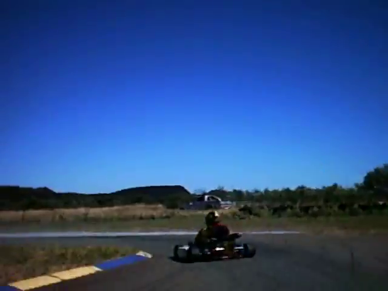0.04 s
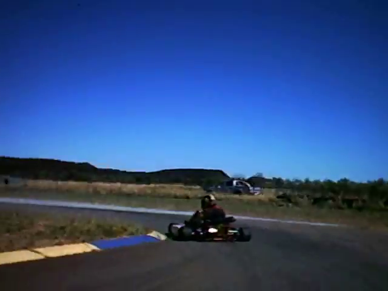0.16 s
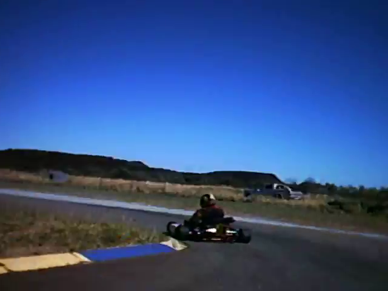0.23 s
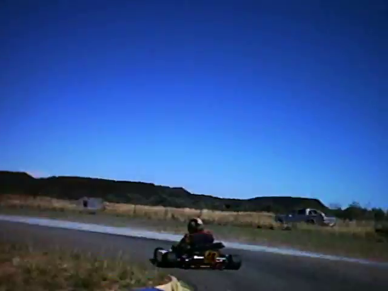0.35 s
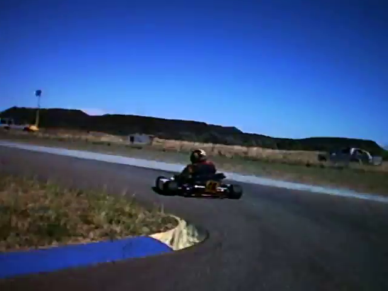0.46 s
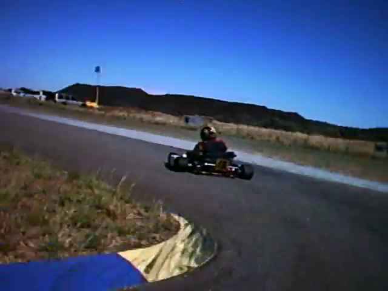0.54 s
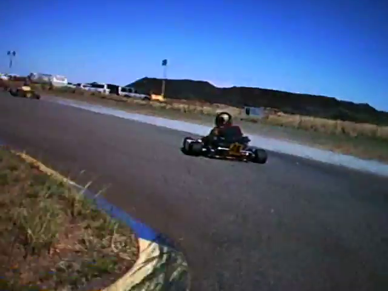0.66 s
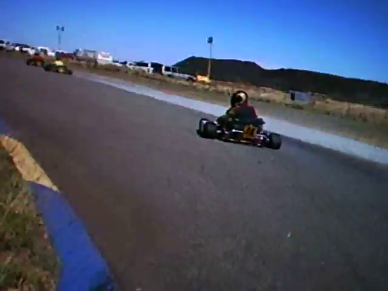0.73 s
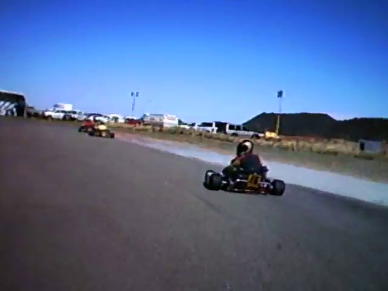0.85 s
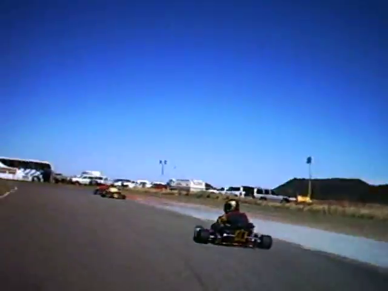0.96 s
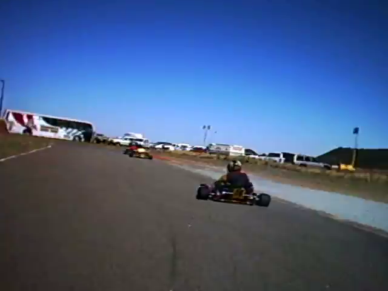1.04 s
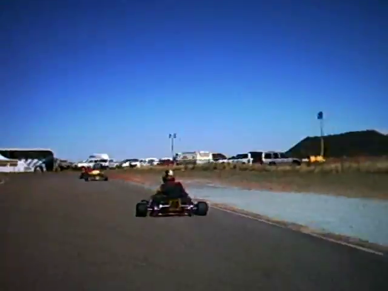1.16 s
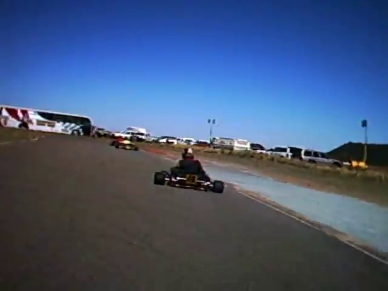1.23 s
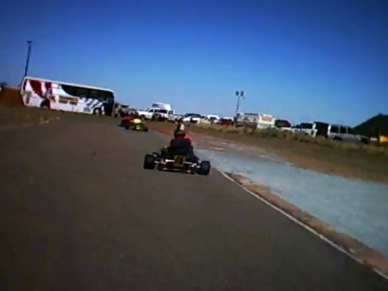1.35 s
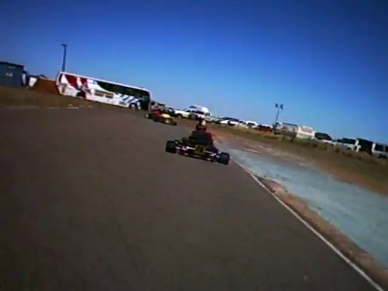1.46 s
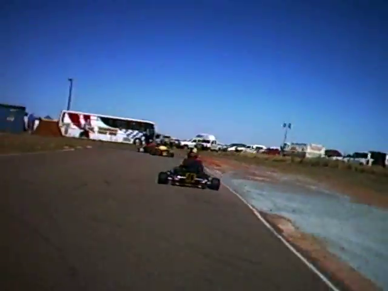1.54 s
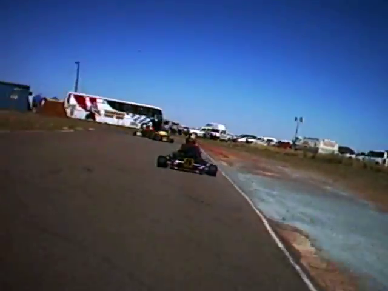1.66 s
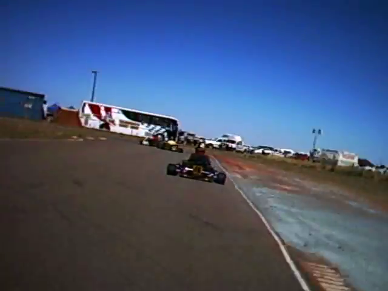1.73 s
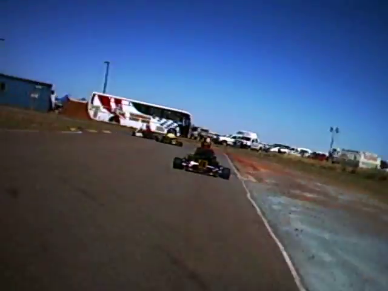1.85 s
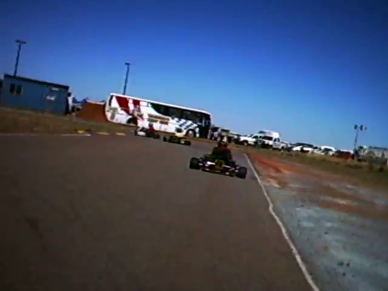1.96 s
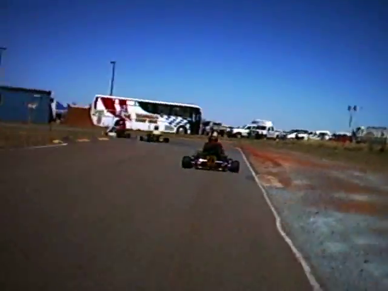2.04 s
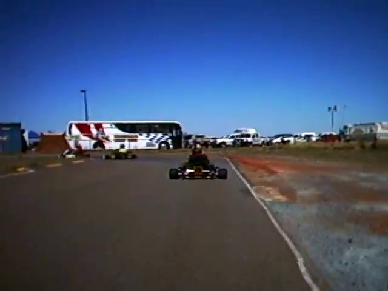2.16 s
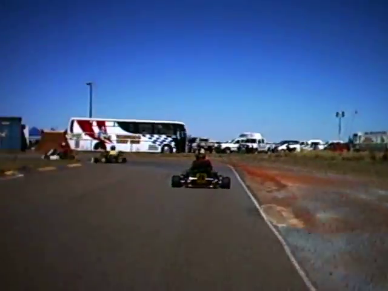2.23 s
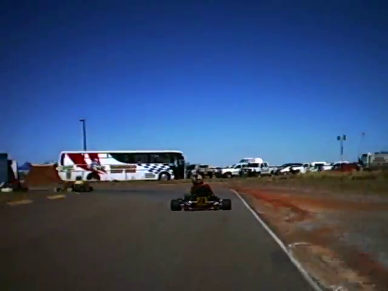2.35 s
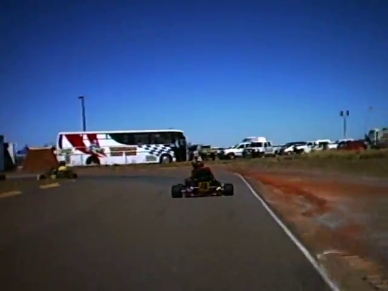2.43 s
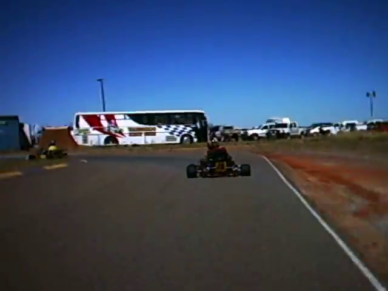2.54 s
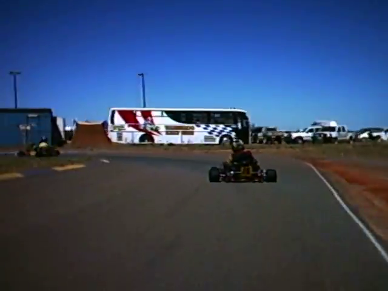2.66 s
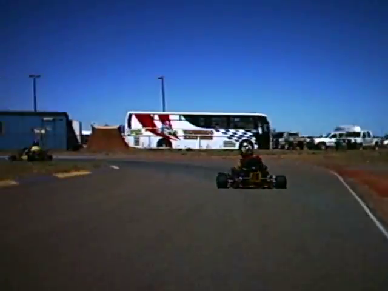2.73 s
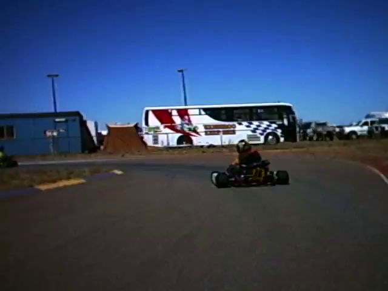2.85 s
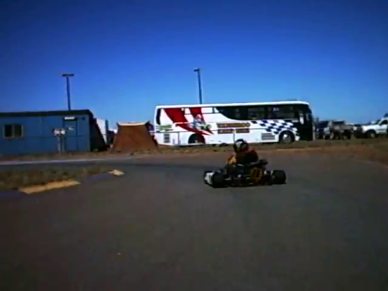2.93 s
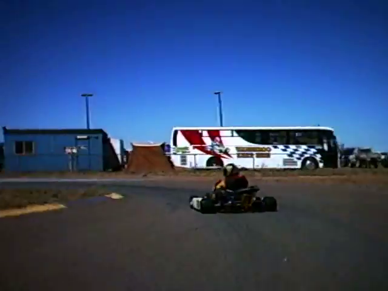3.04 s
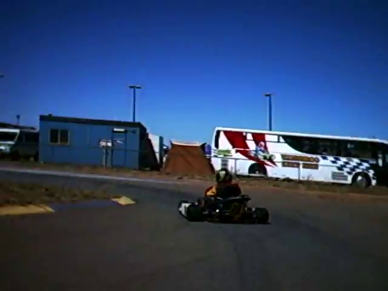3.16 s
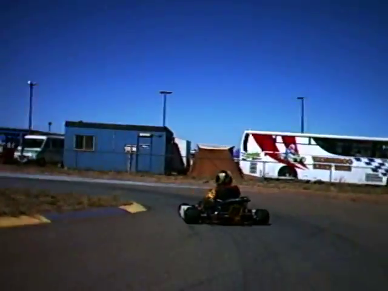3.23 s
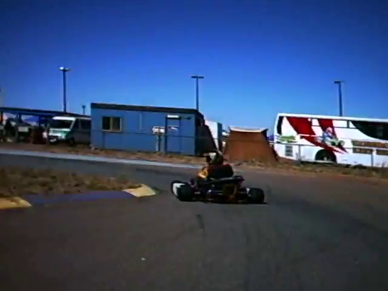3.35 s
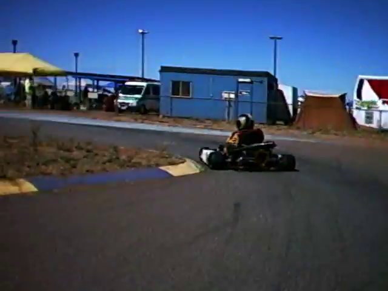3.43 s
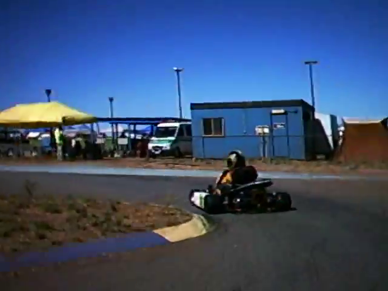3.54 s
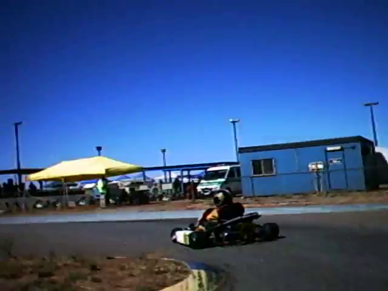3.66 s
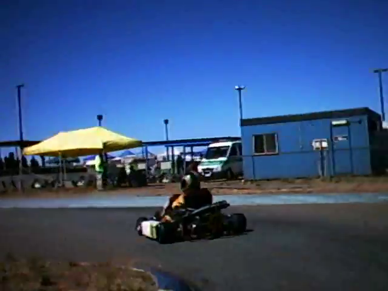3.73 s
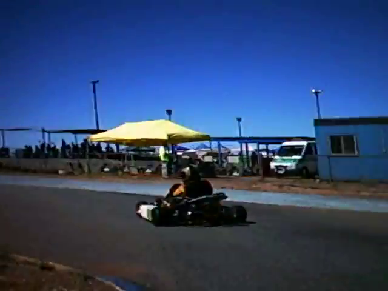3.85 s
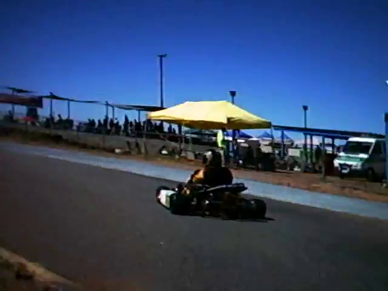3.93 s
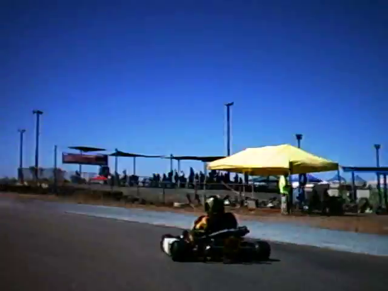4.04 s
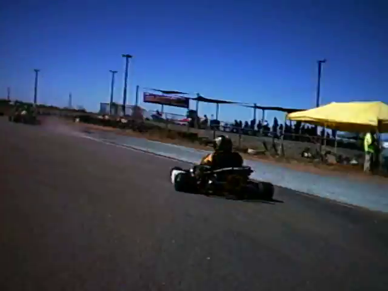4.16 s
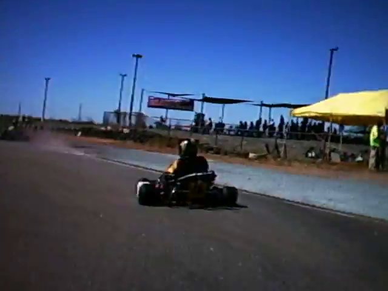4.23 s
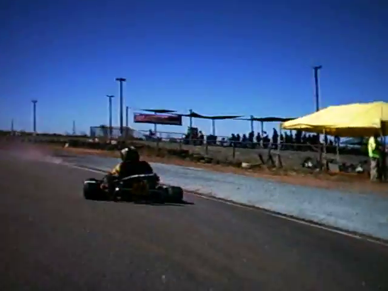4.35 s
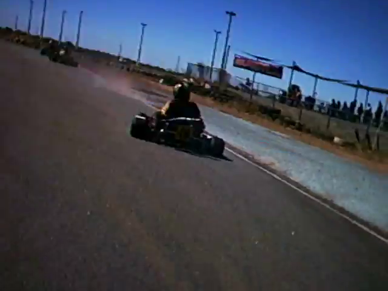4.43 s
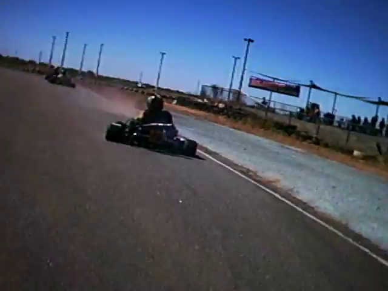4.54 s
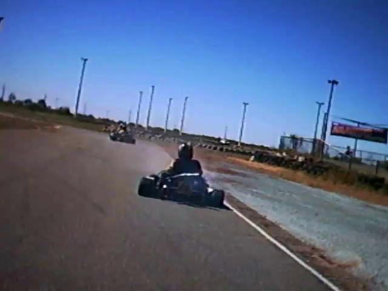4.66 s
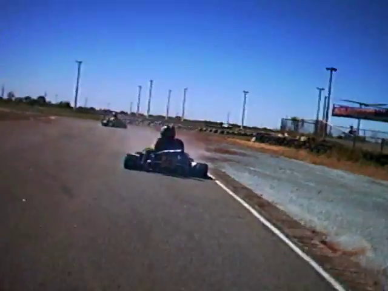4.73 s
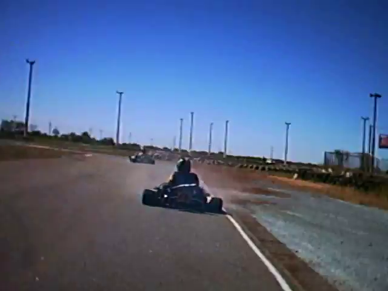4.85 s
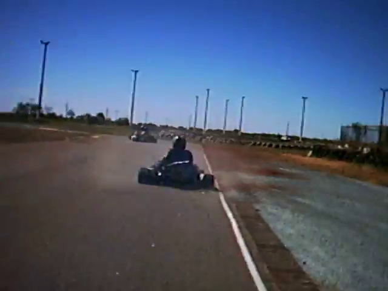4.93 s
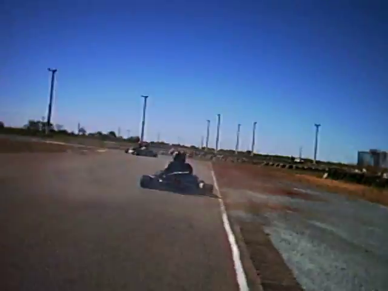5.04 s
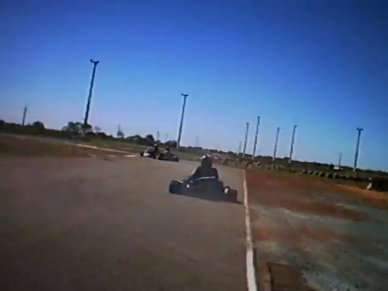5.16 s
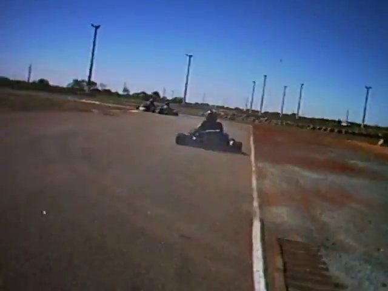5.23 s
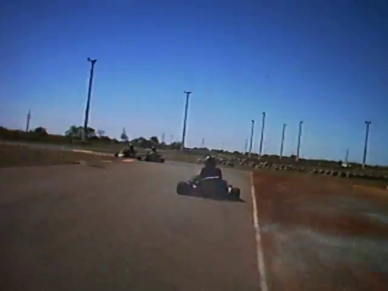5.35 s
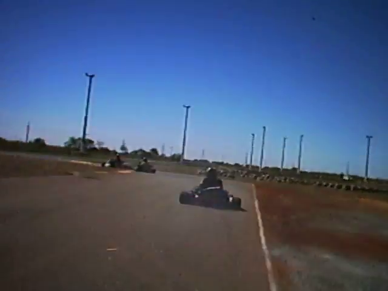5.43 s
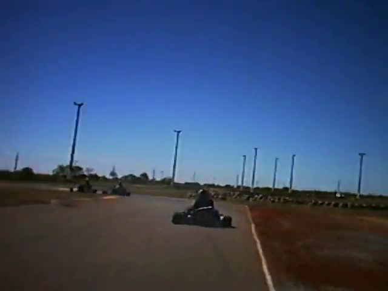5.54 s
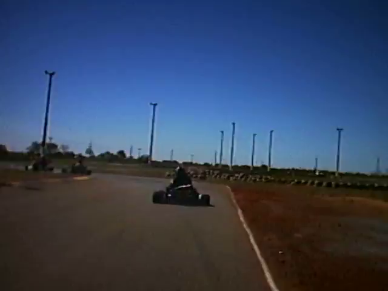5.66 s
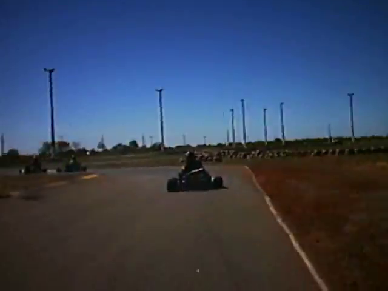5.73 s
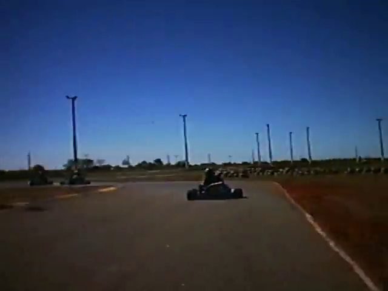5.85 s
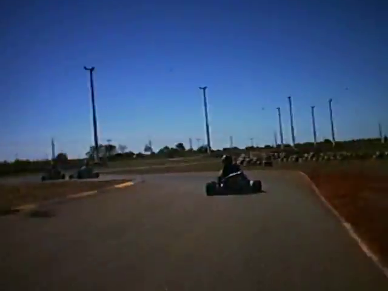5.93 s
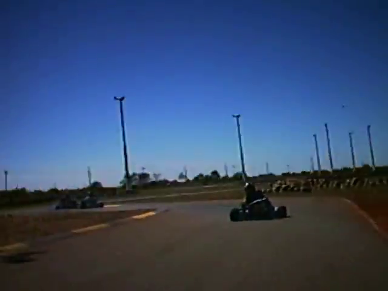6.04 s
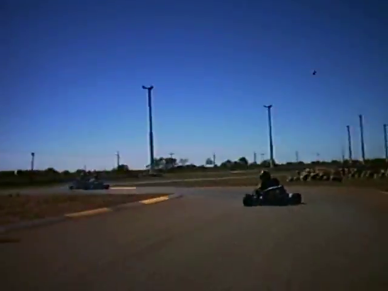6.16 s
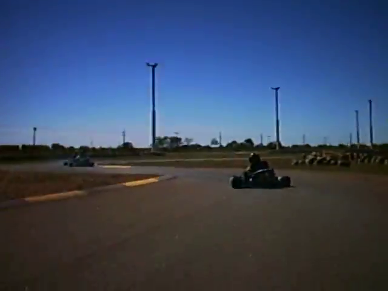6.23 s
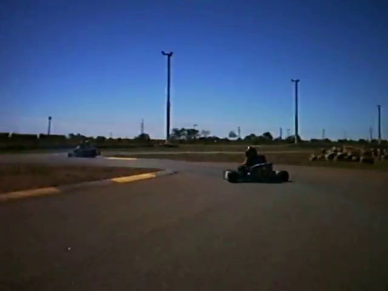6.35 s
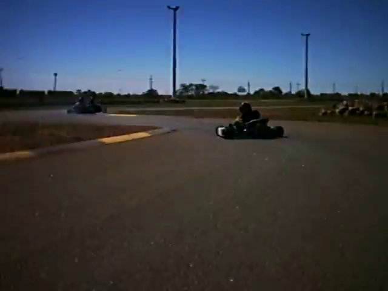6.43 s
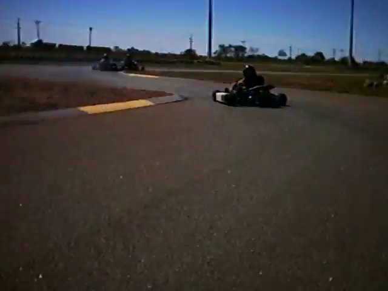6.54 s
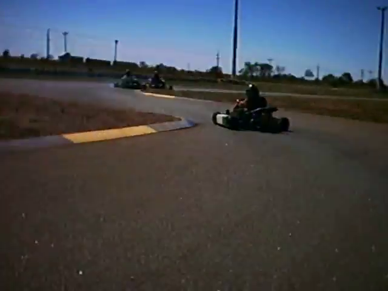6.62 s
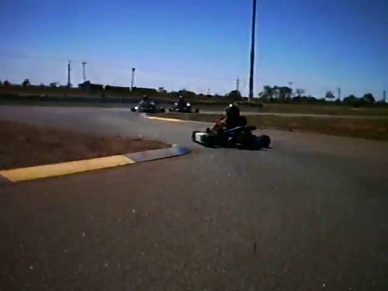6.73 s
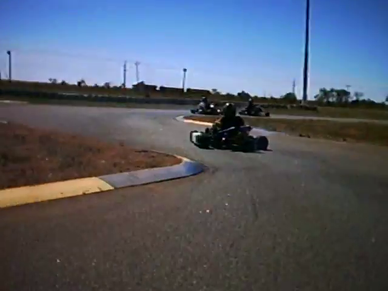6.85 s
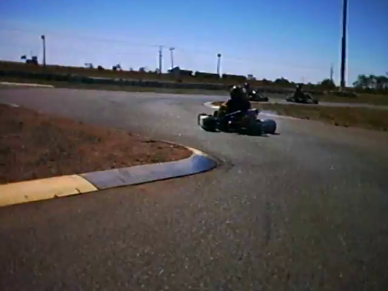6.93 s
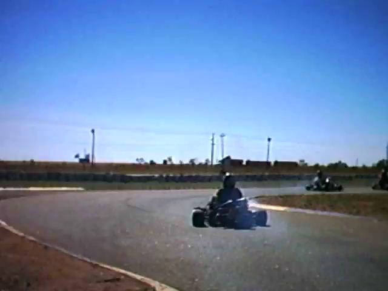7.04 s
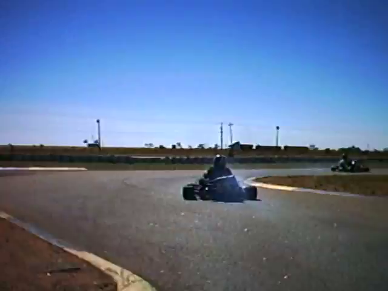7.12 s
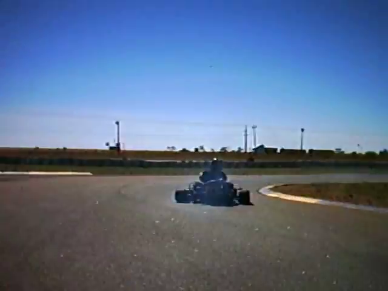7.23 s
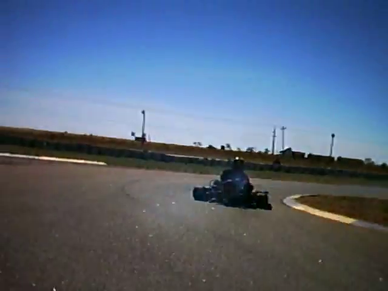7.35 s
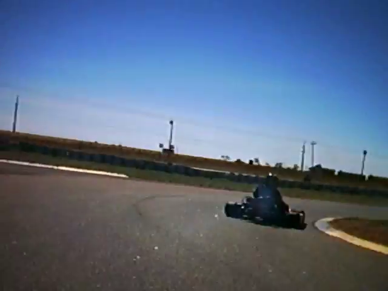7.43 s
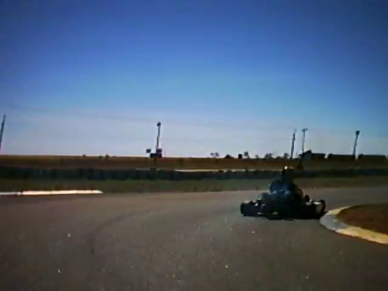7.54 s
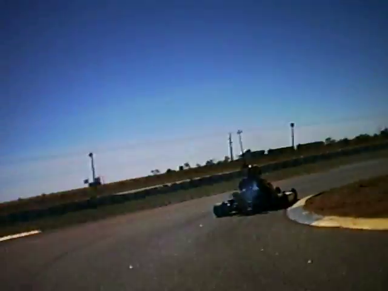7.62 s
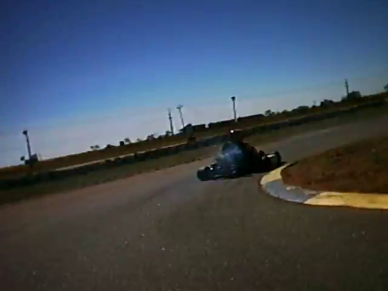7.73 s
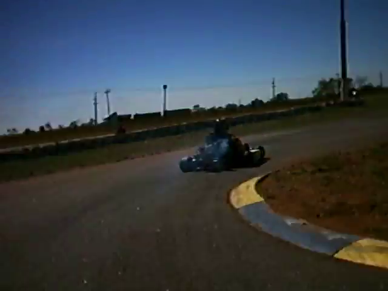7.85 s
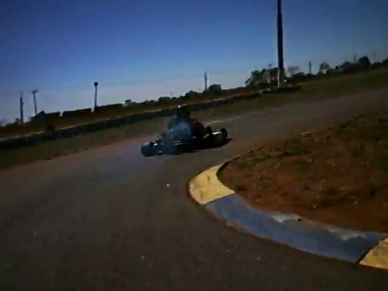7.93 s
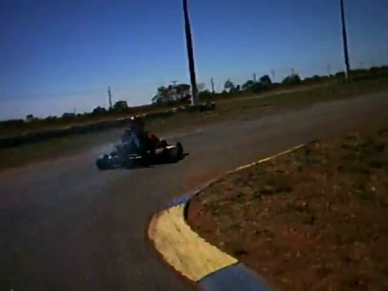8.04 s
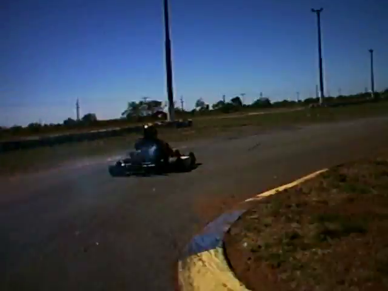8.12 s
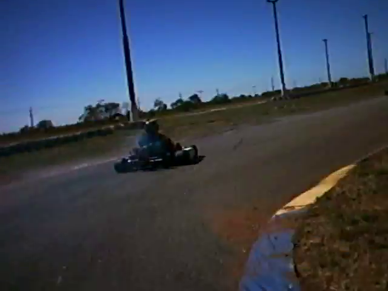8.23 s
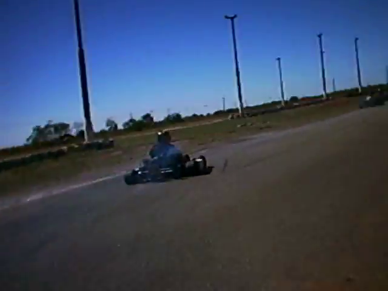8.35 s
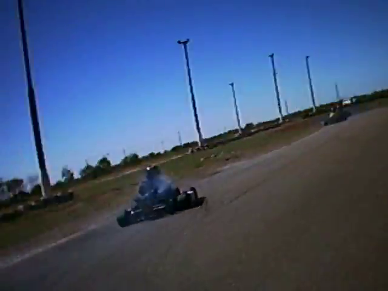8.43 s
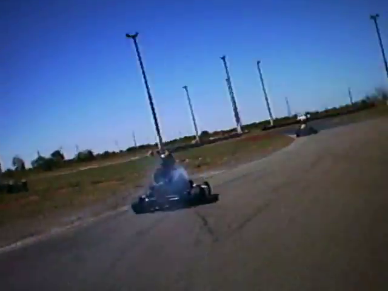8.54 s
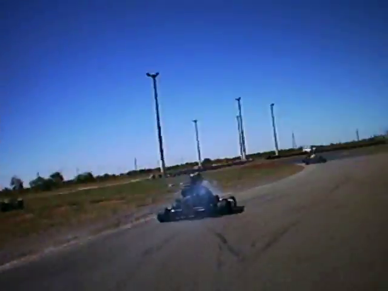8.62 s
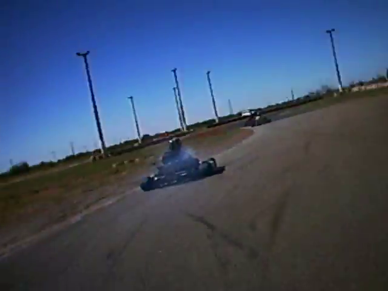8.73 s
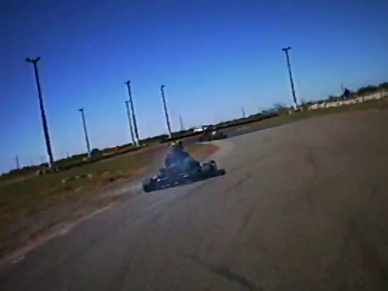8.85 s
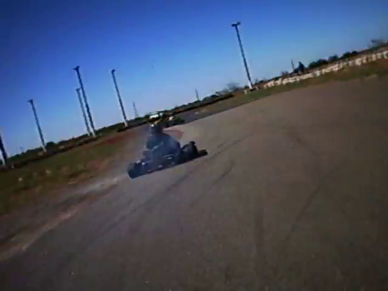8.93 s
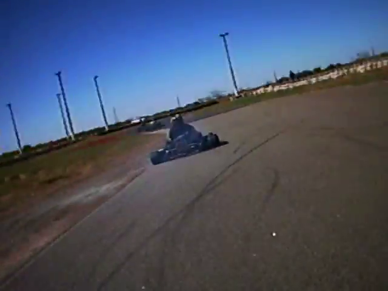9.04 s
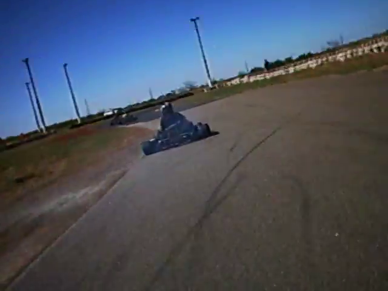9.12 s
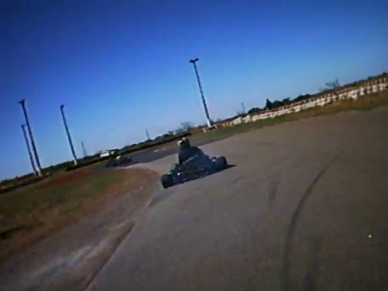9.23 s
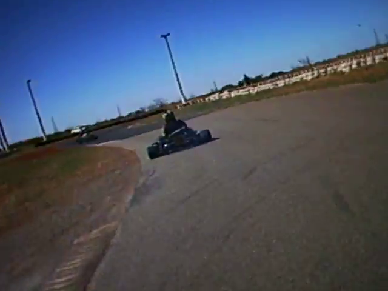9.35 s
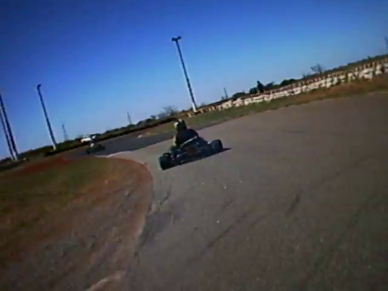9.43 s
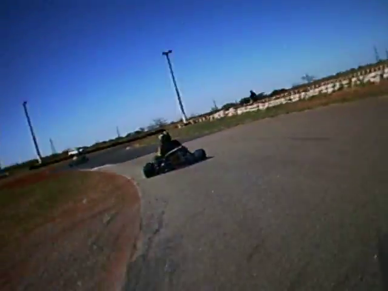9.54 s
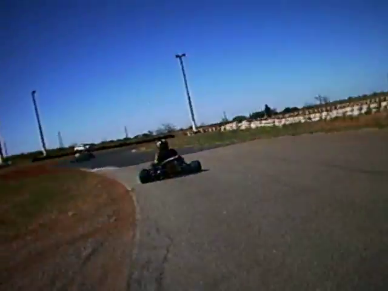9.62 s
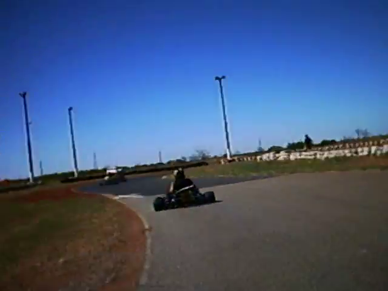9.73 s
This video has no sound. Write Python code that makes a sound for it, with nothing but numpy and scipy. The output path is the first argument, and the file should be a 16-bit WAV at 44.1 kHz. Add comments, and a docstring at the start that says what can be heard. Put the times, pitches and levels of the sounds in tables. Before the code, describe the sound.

A small two-stroke racing kart engine is heard close up from on board on an outdoor circuit. Its raspy, hollow buzz climbs in pitch, drops for a corner, then pulls again, in three main surges. A second kart ahead adds a thinner whine. Chain and frame rattle throughout, with a few knocks and thuds over bumps and a low rush of air and tyres. The sound is narrow and slightly overloaded.

```python
"""Two-stroke racing kart engine, heard on board through a string of corners behind a second kart.
One firing per revolution excites exhaust and tuned pipe; the revs swing as the tyres grip and slip.
Chain and cylinder fins clatter, bumps thud through the frame, air and tyres rush.
A small boxed camera with a narrow band is driven into overload."""
import sys
import numpy as np
from scipy import signal
from scipy.fft import rfft, irfft, next_fast_len
from scipy.io import wavfile

SR = 44100
rng = np.random.default_rng(int(sys.argv[2]) if len(sys.argv) > 2 else 0)


def to_wav(sig):
    """Store sig (one row per channel, or 1-D mono) as 16-bit WAV at the path in sys.argv[1].

    Samples outside -1..1 are clipped; the rate is SR.
    """
    pcm = np.clip(np.atleast_2d(sig), -1, 1) * 32767
    pcm = np.round(pcm).astype(np.int16)
    wavfile.write(sys.argv[1], SR, pcm.T)  # frames by channels


N = 431298
TIME = np.arange(N) / SR

# own revs, tyres gripping: t/s, firing rate/Hz
REVS = [(0, 210), (.24, 209), (.72, 186), (.95, 195), (1.23, 193), (1.45, 201), (1.7, 213), (2.13, 231.5),
        (2.21, 190), (2.53, 193), (2.75, 175), (3.08, 169), (3.15, 184), (3.45, 172), (4.15, 170),
        (4.55, 164), (4.66, 177), (5.08, 174), (5.24, 179), (5.33, 196), (5.6, 200), (6.4, 233), (6.7, 203),
        (7.3, 188), (7.54, 192), (7.68, 178), (8.35, 175), (8.85, 188), (9.3, 208), (9.78, 225)]
# rear tyre slips: t/s, extra firing rate/Hz, exhaust gain/dB
SLIPS = [(.36, 12, -1), (.53, 9, 6), (1.07, 9, -2), (1.31, 12, 2), (1.52, 11, 1), (2.44, 6, 1),
         (3.6, 16, -1), (4.01, 6, 1), (4.46, 7, 1), (5.16, 9, 1), (5.68, 4, 2), (7.99, 15, 6),
         (8.53, 17, 3), (8.75, 10, 2), (8.96, 11, 0)]
# throttle: opens/s, starts closing/s, closing time/s, exhaust gain/dB, rasp gain/dB
THROTTLE = [(.05, .55, .15, 3, -1), (.86, 1.3, 0.035, 13, 8), (1.3, 2.12, .04, 11.5, 10),
            (2.2, 2.4, .25, 12.5, 8), (3.58, 5.22, 0.078, 8, 6.5), (5.22, 6.25, .25, 10, 6.5),
            (7.1, 7.62, .12, 7.5, 3.5), (7.8, 8.42, 0.043, 7.5, 5), (8.42, 9.45, 0.42, 10.5, 8.5)]
# exhaust resonance shift with gas heat: t/s, frequency factor
GAS_HEAT = [(0, 1.05), (1.1, 1.04), (2.05, .94), (2.25, 1.01), (5.0, 1.0), (5.5, 1.07), (6.2, 1.0),
            (8.2, .97), (9.6, 1.1)]
# exhaust response: f/Hz, relative level/dB
EXHAUST_SPECTRUM = [(450, -32), (650, -28.5), (780, -20), (930, -9), (1030, -7.5), (1120, 4), (1220, 0.5),
                    (1400, -7), (1560, -16.5), (1750, -15.5), (2100, -29.5)]
# tuned pipe response: f/Hz, relative level/dB
RASP_SPECTRUM = [(1500, -28), (1850, -18), (2050, -7), (2220, -5.5), (2420, -2), (2600, -5.5), (2780, 4),
                 (2950, -5), (3120, -7), (3300, -19.5), (3650, -10), (3900, -21.5), (4300, -40.5)]
# engine mount vibration: order, level at cruise/dB
MOUNT_ORDERS = [(1, -46), (2, -53)]
# chain, fin and frame response: f/Hz, relative level/dB
CLATTER_SPECTRUM = [(1300, -30), (1700, -16.5), (2050, -13.5), (2400, -8.5), (2650, -3), (2850, 0.5),
                    (3050, -1), (3200, -8.5), (3350, -13.5), (3700, -8), (3950, -15.5), (4200, -22),
                    (4500, -50)]
# frame load in bends: start/s, end/s, easing time/s, clatter gain/dB
BENDS = [(-.2, .9, 0.28, 2), (2.45, 2.68, 0.11, 3), (3.35, 4.7, 0.45, 1.5), (6.4, 7.05, 0.22, 4),
         (7.1, 7.62, 0.22, 2.5), (7.85, 8.4, 0.28, 3)]
# revs of the kart ahead: t/s, firing rate/Hz
AHEAD_REVS = [(0, 167), (.3, 155), (.6, 173), (1.12, 196), (1.7, 221), (2.1, 229), (2.6, 177), (3.6, 142),
              (4.22, 149), (4.66, 173), (5.4, 212), (5.9, 231), (6.5, 189), (7.1, 167), (8.5, 164),
              (9.3, 206), (9.78, 225)]
# its throttle: opens/s, starts closing/s, closing time/s, gain/dB
AHEAD_THROTTLE = [(-.2, .55, .4, 9.5), (.6, 1.85, 0.12, 12), (3.05, 3.3, .15, 5.5), (3.9, 5.5, .3, 15.5),
                  (5.95, 6.5, 1, 9), (8.3, 11, 0.47, 14)]
# its harmonic envelope: f/Hz, relative level/dB
AHEAD_SPECTRUM = [(170, -33), (700, -36.5), (1000, -25), (1220, -8.5), (1500, -24.5), (1850, -17),
                  (2060, -6), (2260, -9.5), (2550, -6), (2820, 3), (3070, 1.5), (3330, -24.5), (3700, -15),
                  (4200, -35.5)]
# frame thuds: t/s, peak level/dB, f/Hz, 1/e half-width/s
BUMPS = [(.1, -36, 70, .06), (1.50, -26, 76, .03), (2.915, -30, 140, .025), (3.785, -31, 76, .028),
         (8.665, -22, 137, .028)]
# hard chassis knocks: t/s, gain/dB
KNOCKS = [(1.471, -14), (2.212, -16), (2.906, -15)]
# chassis modes: f/Hz, relative level/dB, t60/s
CHASSIS_MODES = [(1100, -7.5, .03), (1180, 2, 0.036), (520, -15.5, 0.019)]
# road speed, as air and tyre rush: t/s, level/dB
PACE = [(0, -42.5), (.75, -44.5), (1.25, -44), (1.5, -35), (2.08, -39), (2.18, -40.5), (2.45, -31.5),
        (2.8, -42), (3.03, -49), (3.45, -43), (3.65, -38), (4.1, -40), (4.85, -35), (5.5, -29.5),
        (5.8, -34), (6.2, -28), (6.65, -33.5), (7.0, -31.5), (7.85, -38), (8.5, -29.5), (9.25, -27),
        (9.78, -30)]
# exhaust gas noise: f/Hz, relative level/dB
GAS_SPECTRUM = [(600, -29), (830, -13.5), (1000, -3.5), (1130, 1.5), (1250, 5), (1400, -3.5), (1550, -12.5),
                (1900, -16.5)]
# air and tyre noise: f/Hz, relative level/dB
RUSH_SPECTRUM = [(110, -6.5), (190, 1), (300, 0), (500, -2), (800, 0), (1500, -7), (3000, -20.5)]
# road rumble: f/Hz, relative level/dB
RUMBLE_SPECTRUM = [(15, -7.5), (35, -2), (70, -2.5), (110, -2.5), (170, -7), (300, -24)]

CRUISE_HZ, MID_PACE_DB = 200, -35


def own_engine(rate_hz, turns, slip_db):
    """Hollow exhaust note and pipe rasp, rising with throttle and revs; low hum through the mount."""
    speed = rate_hz / CRUISE_HZ
    octaves = np.log2(speed)
    exhaust_pull_db, rasp_pull_db = trapezoids(THROTTLE, attack_s=.054)
    heat, = curves(GAS_HEAT)
    exhaust_db = -35 + exhaust_pull_db + 5 * octaves + slip_db + 2.1 * drift(21)
    exhaust = harmonics(rate_hz / heat, turns, EXHAUST_SPECTRUM, jitter_turns=.005, waver_db=3)
    rasp_db = -25.5 + rasp_pull_db + 19 * octaves + 1.1 * drift(2.3)
    rasp = harmonics(rate_hz, turns, RASP_SPECTRUM, jitter_turns=.005, waver_db=3.5)
    hum = sum(from_db(db + 4.2 * drift(5.7)) * np.sin(2 * np.pi * order * turns)
              for order, db in MOUNT_ORDERS)
    return from_db(exhaust_db) * exhaust + from_db(rasp_db) * rasp + hum * speed ** 2


def wheel_slip(half_width_s=.055):
    """A rear tyre spins and the revs flare: extra firing rate/Hz, exhaust gain/dB."""
    return sum(np.outer(peaks, np.exp(-((TIME - t) / half_width_s) ** 2)) for t, *peaks in SLIPS)


def crank(revs, wander, slip_hz=0):
    """Nominal firing rate/Hz and accumulated turns of a slightly unsteady crank."""
    rate_hz = curves(revs)[0] + slip_hz
    unsteady_hz = rate_hz * (1 + wander * (drift(25) + drift(5)))
    return rate_hz, np.cumsum(unsteady_hz) / SR


def harmonics(rate_hz, turns, spectrum, jitter_turns, waver_db, count=24):
    """Firing harmonics glide through resonances; uneven burns roughen the high ones most. Rms 1."""
    tone, power = 0, 1e-12
    uneven_turns = turns + jitter_turns * drift(79)
    for k in range(1, count + 1):
        gain = np.interp(TIME, TIME[::64], response(spectrum, k * rate_hz[::64]))
        gain *= from_db(waver_db * (drift(4) + .6 * drift(30)))
        phase = 2 * np.pi * ((k * uneven_turns + rng.random()) % 1)
        tone += gain * np.sin(phase)
        power += gain ** 2 / 2
    return unit_rms(tone / np.sqrt(power))


def firings(turns, spread_db, decay_per_turn):
    """Envelope of one decaying burst per turn, each of random strength."""
    strength = from_db(spread_db * rng.standard_normal(4096))[turns.astype(int)]
    return strength * np.exp(-decay_per_turn * (turns % 1))


def clatter(turns, pace_db):
    """Each firing rattles chain, fins and frame; louder at speed and in bends."""
    bend_db, = trapezoids(BENDS, attack_s=.14)
    level_db = -16.5 + .66 * (pace_db - MID_PACE_DB) + bend_db
    shaking = firings(turns, spread_db=.02, decay_per_turn=.61)
    flutter = from_db(1.03 * drift(22) + .6 * drift(2.7))
    return from_db(level_db) * coloured(rng.standard_normal(N) * shaking * flutter, CLATTER_SPECTRUM)


def kart_ahead():
    """Second engine, thin with distance, heard mostly on throttle."""
    pull_db, = trapezoids(AHEAD_THROTTLE, attack_s=.43)
    rate_hz, turns = crank(AHEAD_REVS, wander=.002)
    tone = harmonics(rate_hz, turns, AHEAD_SPECTRUM, jitter_turns=.006, waver_db=3.5)
    return from_db(-28.5 + pull_db) * tone


def bumps():
    """The unsprung frame thuds over bumps; hard knocks ring its modes."""
    frame = np.zeros(N)
    for t, db, hz, half_width_s in BUMPS:
        envelope = from_db(db) * np.exp(-((TIME - t) / half_width_s) ** 2)
        frame += envelope * np.sin(2 * np.pi * hz * (TIME - t) + drift(25))
    for t, knock_db in KNOCKS:
        age_s = np.clip(TIME - t, 0, 1)
        for hz, mode_db, t60_s in CHASSIS_MODES:
            frame += from_db(knock_db + mode_db - 60 * age_s / t60_s) * np.sin(2 * np.pi * hz * age_s)
    return frame


def rush(turns, pace_db):
    """Exhaust gas puffs, lumpy air and tyre noise, road rumble; all swell with road speed."""
    puffs = rng.standard_normal(N) * firings(turns, spread_db=2.5, decay_per_turn=.33)
    gas = coloured(puffs, GAS_SPECTRUM)
    air = coloured(rng.standard_normal(N) * from_db(1.8 * drift(13)), RUSH_SPECTRUM)
    road = coloured(rng.standard_normal(N) * from_db(2.4 * drift(9.9)), RUMBLE_SPECTRUM)
    swing_db = pace_db - MID_PACE_DB
    gas_db = -30.5 + .35 * swing_db
    road_db = -40.5 + .61 * swing_db
    return from_db(gas_db) * gas + from_db(pace_db) * air + from_db(road_db) * road


def from_db(db):
    """Decibels to gain."""
    return 10 ** (np.asarray(db) / 20)


def unit_rms(x):
    """Scale to rms 1."""
    return x / np.sqrt(np.mean(x ** 2) + 1e-20)


def curves(rows):
    """Rows of (t/s, values..) to one per-sample curve per value column."""
    times_s, *columns = np.transpose(rows)
    return [np.interp(TIME, times_s, column) for column in columns]


def trapezoids(rows, attack_s):
    """Summed attack-hold-release shapes, one curve per gain column."""
    total = 0
    for start_s, end_s, release_s, *gains in rows:
        attack = np.clip((TIME - start_s) / attack_s, 0, 1)
        release = np.clip(1 - (TIME - end_s) / release_s, 0, 1)
        total += np.outer(gains, attack * release)
    return total


def drift(corner_hz, hop=40, settle=2000):
    """Slow noise, rms about 1: two one-pole low-passes."""
    pole = np.exp(-2 * np.pi * corner_hz * hop / SR)
    noise = rng.standard_normal(N // hop + settle + 2)
    slow = signal.lfilter([1], [1, -2 * pole, pole * pole], noise)[settle:]
    return np.interp(np.arange(N) / hop, np.arange(len(slow)), unit_rms(slow))


def response(spectrum, hz):
    """Spectrum gain on a log frequency axis, rolled off past both ends."""
    points_hz, points_db = np.transpose(spectrum)
    points_hz = np.r_[points_hz[0] / 2, points_hz, points_hz[-1] * 2]
    points_db = np.r_[points_db[0] - 20, points_db, points_db[-1] - 60]
    return from_db(np.interp(np.log(hz + 1e-3), np.log(points_hz), points_db))


def coloured(excitation, spectrum):
    """Excitation filtered by a spectrum; rms 1."""
    size = next_fast_len(N + SR // 10)
    bins_hz = np.arange(size // 2 + 1) * SR / size
    return unit_rms(irfft(rfft(excitation, size) * response(spectrum, bins_hz), size)[:N])


def scene():
    """Mono sum at the on-board camera."""
    slip_hz, slip_db = wheel_slip()
    rate_hz, turns = crank(REVS, wander=.001188, slip_hz=slip_hz)
    pace_db, = curves(PACE)
    engines = own_engine(rate_hz, turns, slip_db) + kart_ahead()
    return (engines + clatter(turns, pace_db) + rush(turns, pace_db) + bumps())[None]


def record(dry, drive_db=1.02, ceiling=.75, clip_level=.72, band_hz=4440, cutoff_hz=15900):
    """Fast limiter, narrow band; then a hard clip adds faint crackle on the tallest crests; low-pass."""
    hot = dry * from_db(drive_db)
    envelope = abs(signal.hilbert(hot, next_fast_len(N))[:, :N])
    limited = hot * (1 + (envelope / ceiling) ** 10) ** (-1 / 10)
    narrow = signal.sosfiltfilt(signal.ellip(10, .2, 95, band_hz, fs=SR, output="sos"), limited)
    clipped = np.clip(narrow, -clip_level, clip_level)
    return signal.sosfilt(signal.ellip(10, .2, 80, cutoff_hz, fs=SR, output="sos"), clipped)


dry = scene()
out = record(dry)
to_wav(out)
```